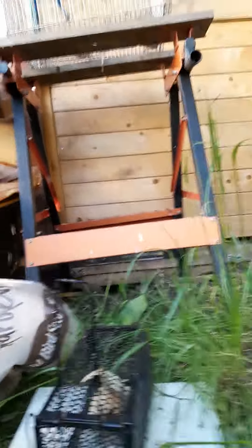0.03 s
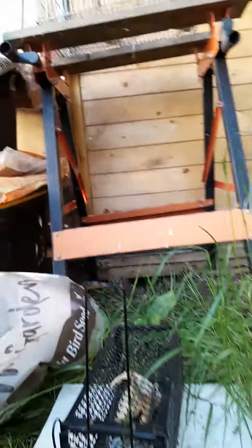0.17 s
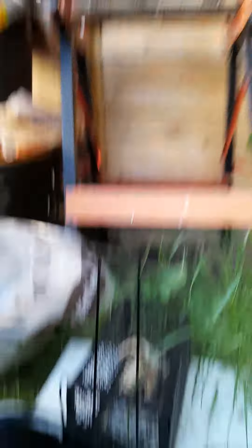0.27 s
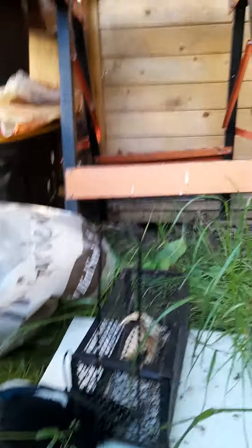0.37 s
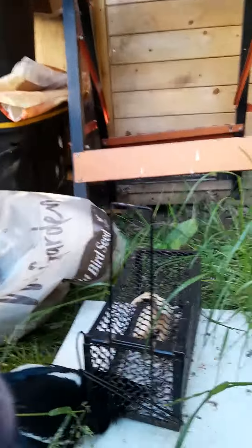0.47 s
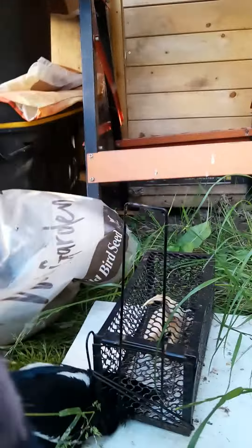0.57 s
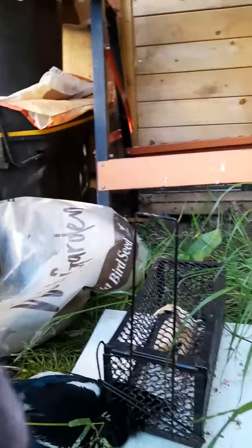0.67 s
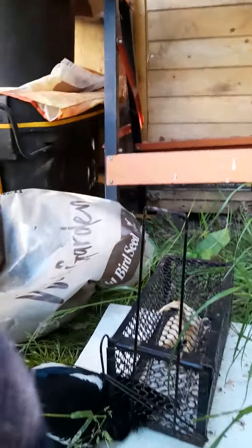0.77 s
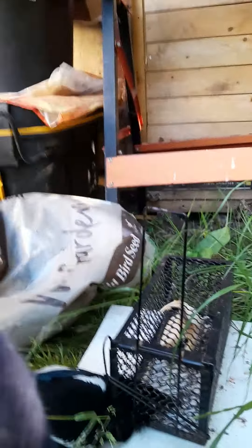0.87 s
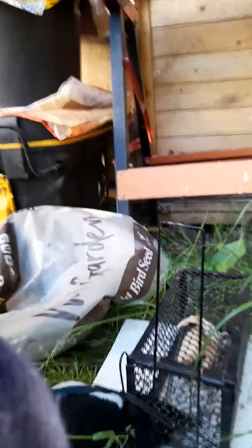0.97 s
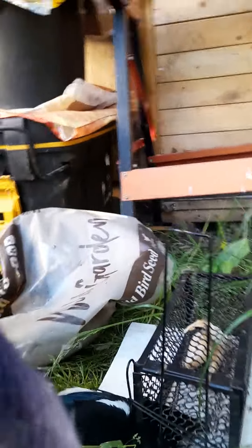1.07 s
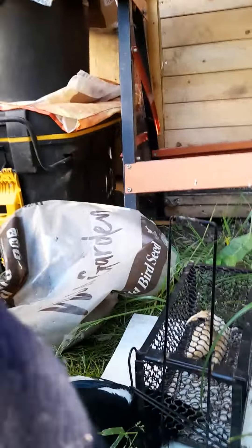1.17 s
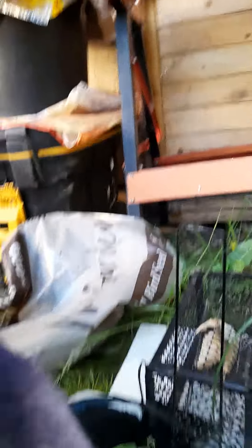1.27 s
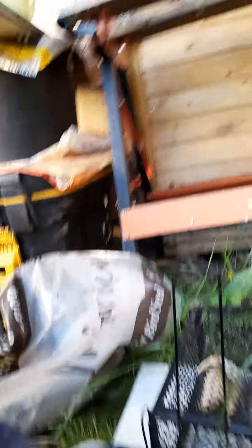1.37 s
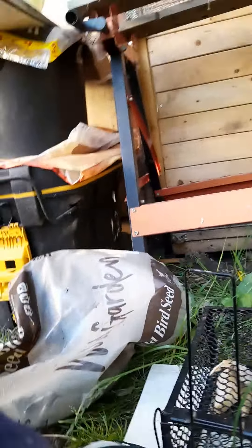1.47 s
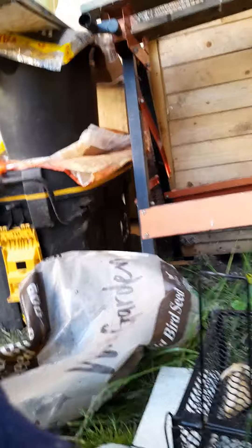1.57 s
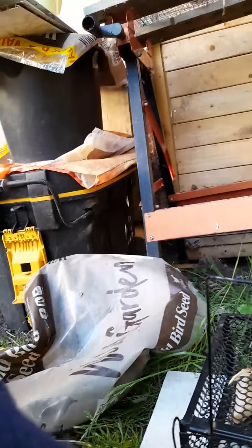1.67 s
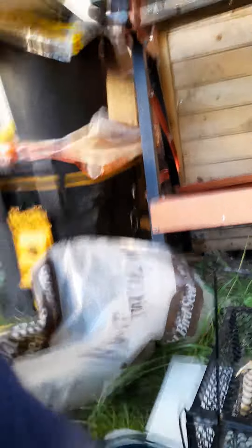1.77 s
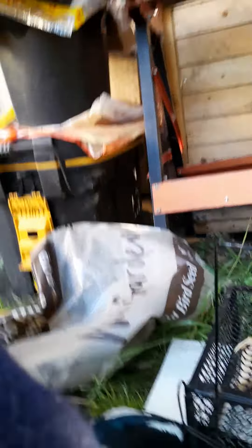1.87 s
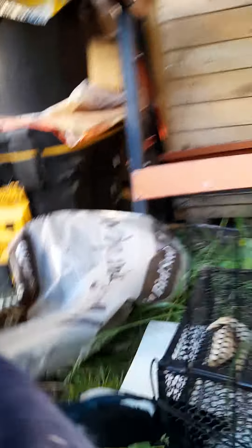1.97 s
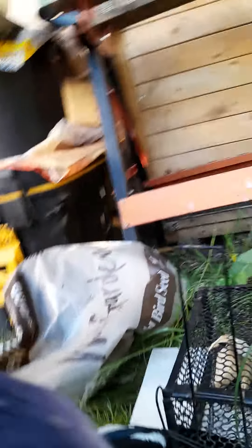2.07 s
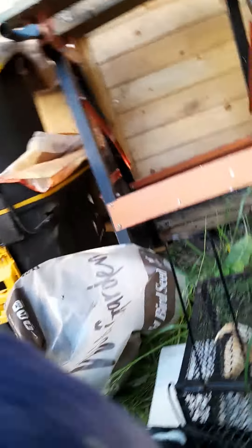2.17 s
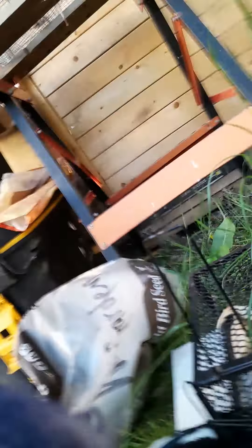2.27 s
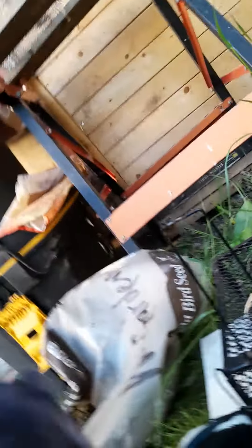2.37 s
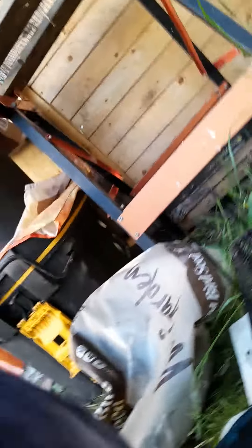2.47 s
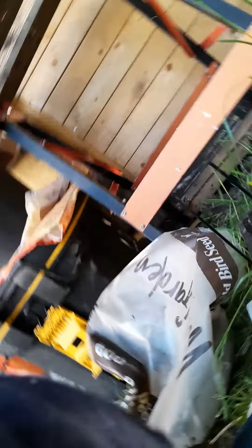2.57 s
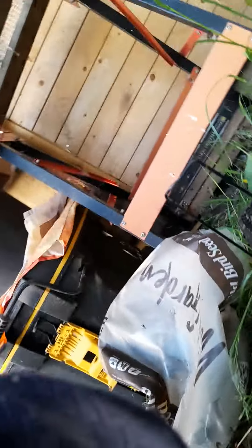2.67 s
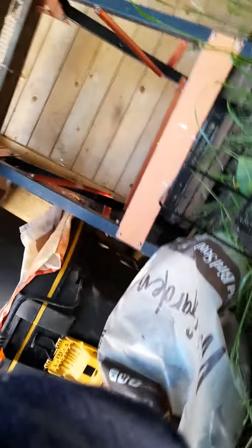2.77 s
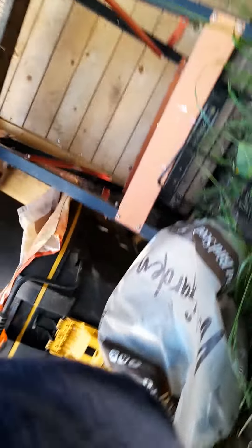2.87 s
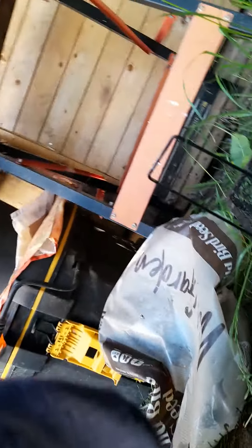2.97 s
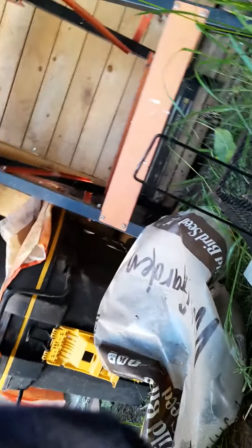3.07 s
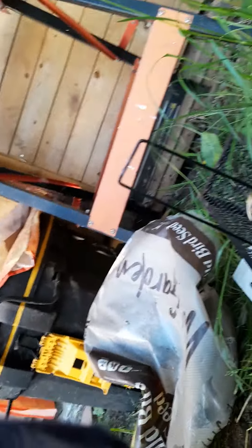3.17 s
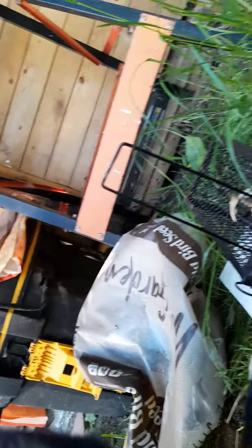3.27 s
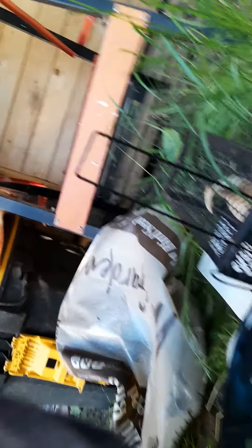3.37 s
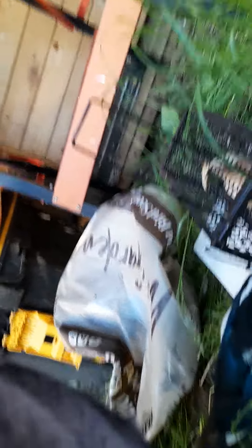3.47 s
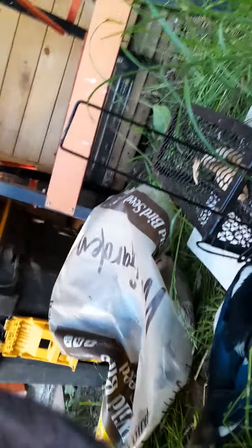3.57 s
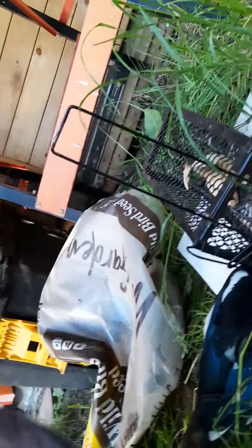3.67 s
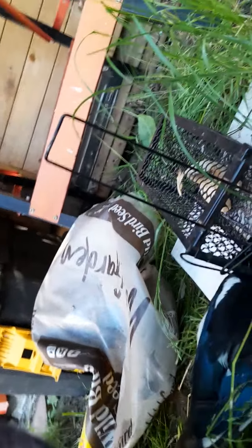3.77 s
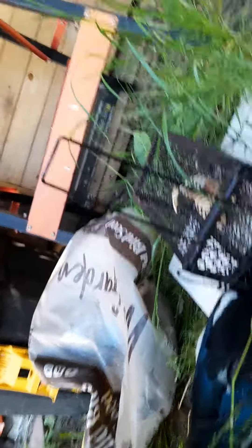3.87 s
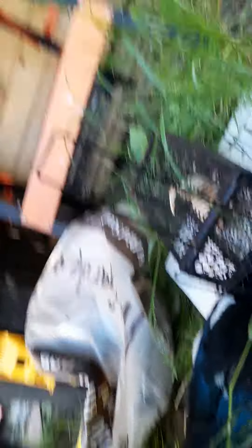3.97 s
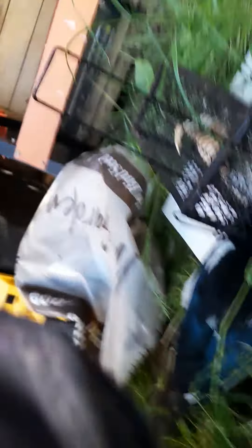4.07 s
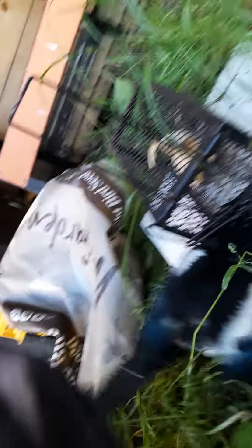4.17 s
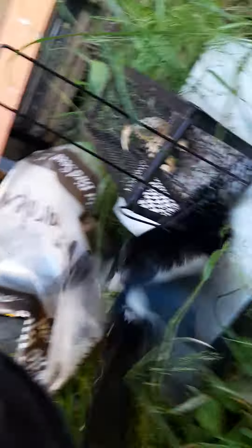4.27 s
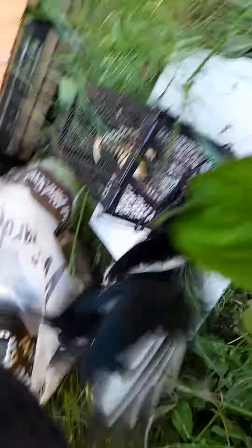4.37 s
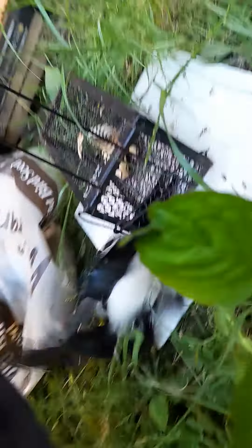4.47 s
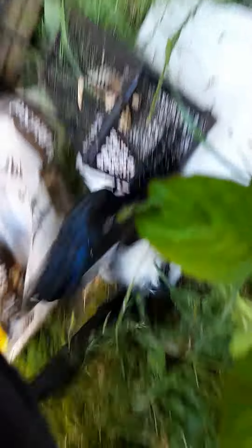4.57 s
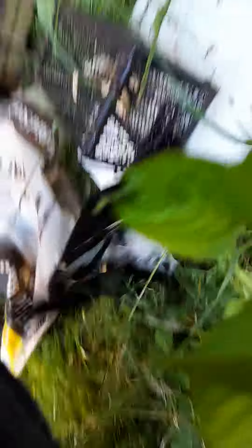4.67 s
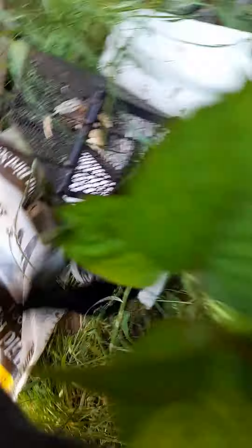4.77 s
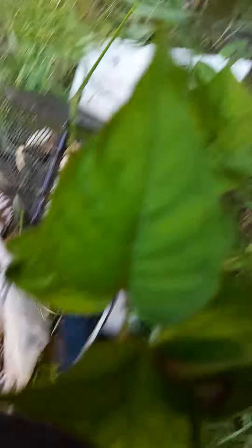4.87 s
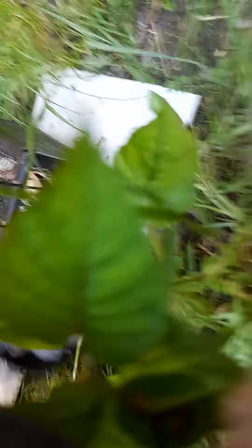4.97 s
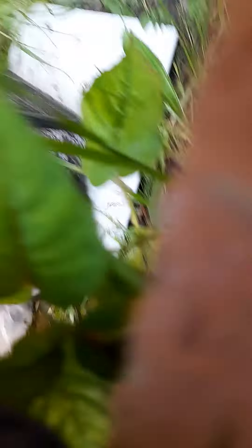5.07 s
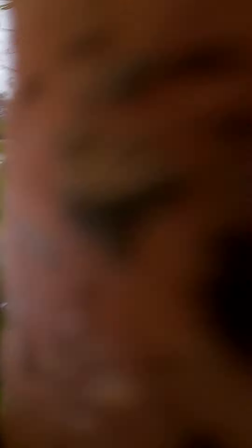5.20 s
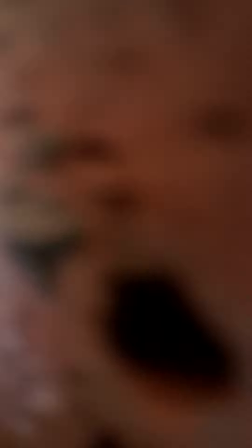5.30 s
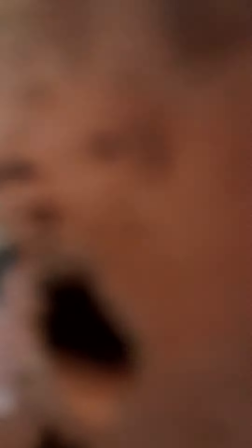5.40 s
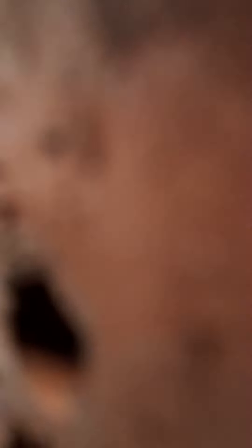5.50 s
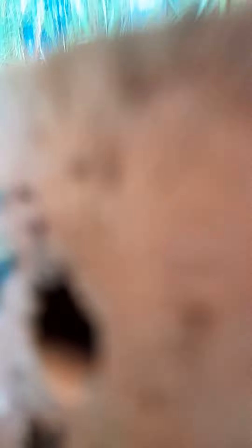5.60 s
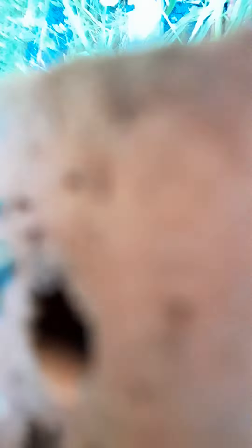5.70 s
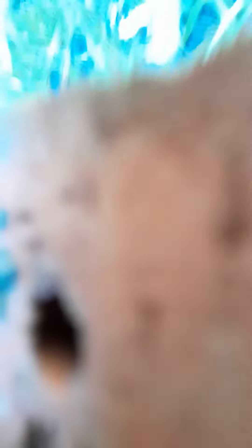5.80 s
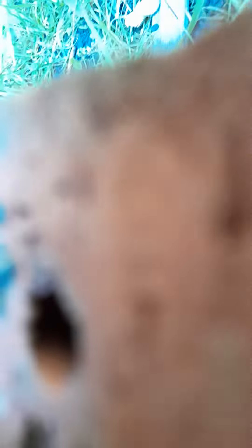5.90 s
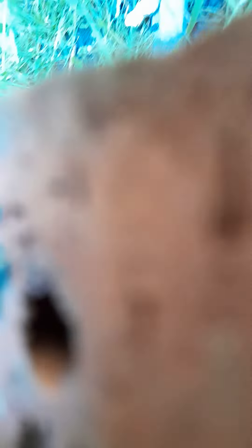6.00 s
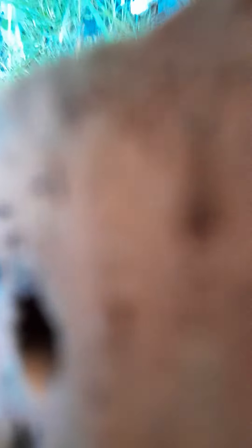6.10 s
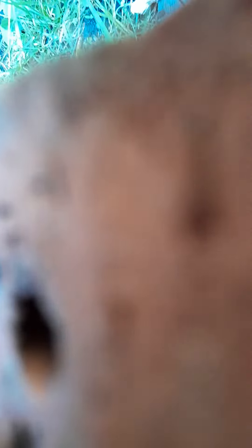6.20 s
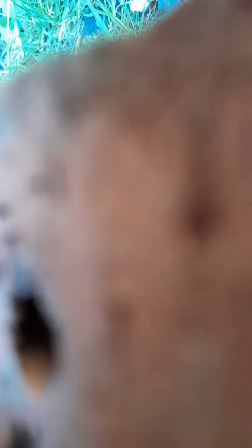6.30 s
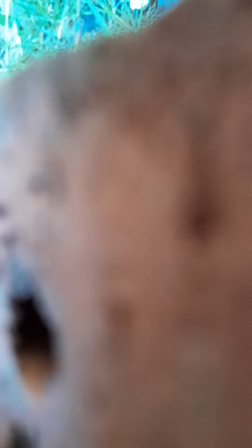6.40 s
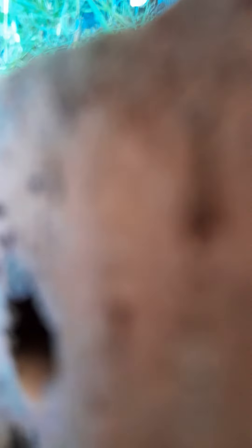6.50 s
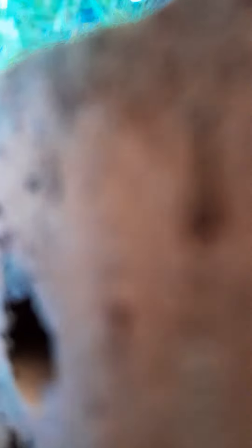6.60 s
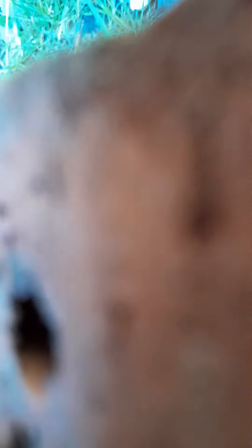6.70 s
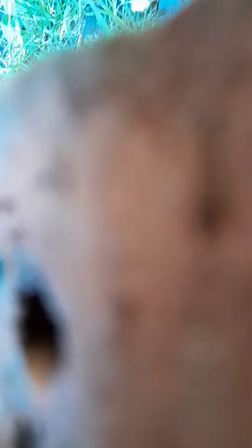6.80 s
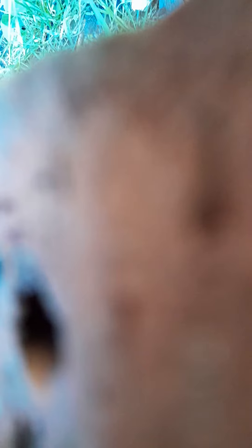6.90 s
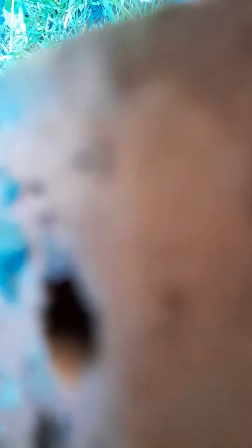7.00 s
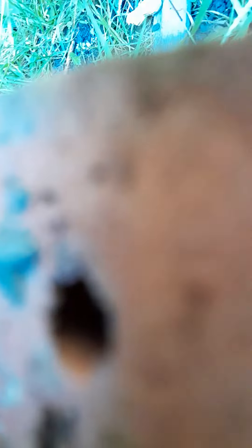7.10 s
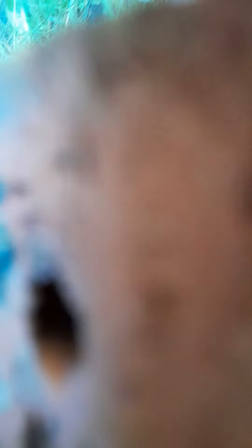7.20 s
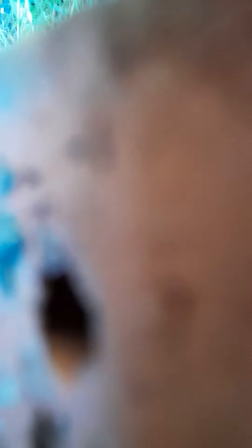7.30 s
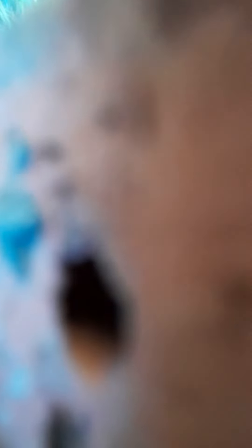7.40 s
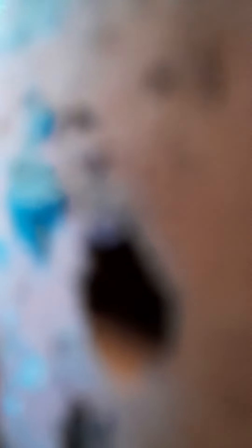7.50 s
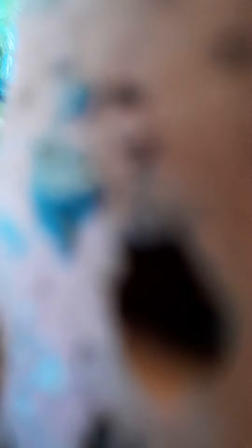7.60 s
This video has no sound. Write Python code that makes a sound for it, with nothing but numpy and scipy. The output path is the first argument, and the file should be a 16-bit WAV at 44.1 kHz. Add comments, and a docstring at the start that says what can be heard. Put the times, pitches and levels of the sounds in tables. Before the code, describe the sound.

In a garden, a bird lightly taps a wire cage, then thrashes in the grass with loud mesh bangs, cracks, rustling and low thuds.

```python
"""A bird at a wire cage

In a garden, with a phone in the hand, a bird taps a cage, then thrashes in the grass and bangs the mesh.
Blows ring decaying modes, snaps are noise bursts, thuds sagging low notes; shaken mesh is resonant noise.
Feathers, leaves and cloth rustle as grainy coloured noise; sparrows and other birds are gliding sines with echoes.
Traffic and town are coloured noise; one engine slows down, a sinking tone with a second harmonic.
"""
import sys
import numpy as np
from scipy import signal
from scipy.fft import rfft, irfft, next_fast_len
from scipy.io import wavfile
from scipy.ndimage import uniform_filter1d

SR = 44100
rng = np.random.default_rng(int(sys.argv[2]) if len(sys.argv) > 2 else 0)


def wrap_up_sound(samples):
    """Save the sound to the file named by the first command line argument, as 16-bit audio."""
    columns = np.atleast_2d(samples).T
    # keep every value between -1 and 1, then stretch to whole-number steps
    tamed = np.clip(columns, -1, 1)
    steps = np.round(tamed * 32767).astype(np.int16)
    wavfile.write(sys.argv[1], SR, steps)


N = 337351
T = np.arange(N) / SR  # time, s

# Levels are relative and precede the phone's response; spectra give weights that are then set to rms 1.
# Noise of the garden: pitch_hz, density_db
GARDEN_SPECTRUM = [(59, -44.5), (100, 2.5), (210, -14), (239, -7.5), (315, -18.5), (1150, -25.5),
                   (1520, -32), (5000, -38.5), (8500, -33), (9300, -44), (16000, -36.5)]
# Rumble of distant engines: pitch_hz, density_db
RUMBLE_SPECTRUM = [(28, -16.5), (55, 14), (80, 9), (130, -40)]
# Course of the traffic rumble: time_s, level_db
TRAFFIC_LEVEL = [(0.0, -35), (0.22, -51.5), (0.55, -63), (1.5, -67), (2.23, -51), (3.3, -65.5),
                 (3.78, -49.5), (4.21, -49), (4.44, -43), (4.97, -50), (5.25, -37), (6.85, -40.5),
                 (6.93, -55.5), (7.08, -46.5), (7.25, -60), (7.65, -51.5)]
# Course of the single engine note: time_s, level_db
ENGINE_LEVEL = [(5.4, -37), (6.0, -38.5), (6.16, -29.5), (6.4, -32), (6.46, -48), (6.55, -32), (6.9, -46.5),
                (6.94, -88.5)]
# Sparrow chirps: start_s, level_db, top_pitch_hz
CHIRPS = [(0.749, -54, 5026), (1.884, -50.5, 4950), (2.99, -52.5, 5024), (3.912, -51, 5140),
          (6.133, -57.5, 5500)]
# Arched tweets of other birds: start_s, length_s, top_pitch_hz, drop_at_both_ends (share of the top), level_db
TWEETS = [(2.888, 0.06, 5500, 0.57, -61), (3.319, 0.11, 4970, 0.14, -65), (3.878, 0.04, 6050, 0.15, -63.5),
          (7.062, 0.065, 5810, 0.38, -59.5), (7.147, 0.055, 4540, 0.3, -65),
          (7.421, 0.045, 5420, 0.12, -68.5), (7.506, 0.062, 5800, 0.099, -70)]
# Whistles gliding evenly, most of them falling: start_s, length_s, first_pitch_hz, last_pitch_hz, level_db
WHISTLES = [(0.096, 0.057, 3006, 2360, -58.5), (0.41, 0.1, 3840, 3790, -69),
            (1.231, 0.11, 3800, 3480, -68.5), (2.837, 0.14, 3690, 3980, -65.5),
            (3.163, 0.054, 3210, 2500, -60.5), (3.375, 0.067, 3705, 2850, -59),
            (6.218, 0.22, 4010, 3500, -69)]
# Throat resonances of the hoarse call: centre_hz, width_hz, weight_db
THROAT = [(1550, 200, -4), (3780, 1200, -0.5)]
# Swishes of feathers, leaves and cloth: middle_s, half_length_s, hiss_level_db
SWISHES = [(0.036, 0.0097, -27.5), (0.977, 0.026, -53), (1.207, 0.02, -56), (1.868, 0.021, -53.5),
           (2.154, 0.046, -60), (2.275, 0.022, -59), (2.488, 0.024, -61.5), (4.165, 0.015, -47.5),
           (4.42, 0.015, -38), (4.674, 0.0093, -22.5), (5.193, 0.035, -45.5), (5.244, 0.0051, -26),
           (5.47, 0.018, -40), (5.574, 0.011, -36), (5.591, 0.011, -26.5), (5.686, 0.019, -27),
           (5.792, 0.032, -51), (5.891, 0.037, -50), (5.949, 0.0051, -32.5), (6.034, 0.11, -61),
           (6.616, 0.036, -46), (6.765, 0.031, -55), (6.86, 0.024, -44), (7.552, 0.064, -56.5)]
# Bouts of thrashing in the grass: start_s, end_s, level_db
THRASH = [(4.218, 5.325, -47), (5.405, 5.851, -44)]
# Bright part of the rustle: pitch_hz, density_db
HISS_SPECTRUM = [(1500, -28), (2600, -12), (7000, -6.5), (9000, -11.5), (13000, -14.5), (16000, -8)]
# Duller part of the rustle: pitch_hz, density_db
BODY_SPECTRUM = [(150, 3.5), (500, -7.5), (1000, -10.5), (2000, -10.5), (7000, -19)]
# Borders of the bands that swell apart: pitch_hz
PATCH_EDGES_HZ = [700, 1500, 3000, 5500, 9000]
# Balance as the phone swings about: time_s, left_minus_right_db
PAN = [(0, -37), (1.8, -5.5), (3.7, -20), (4.2, 8), (6, 6.5), (7.6, 11)]
# Dull thuds through the ground and the hand: start_s, peak_db, initial_pitch_hz
THUDS = [(0.855, -37, 136), (0.981, -31, 94), (4.318, -22, 217), (4.39, -27.5, 95), (5.108, -26, 220),
         (5.256, -25, 127), (5.43, -21, 111), (5.466, -17, 89), (5.59, -20, 88), (5.681, -16.5, 229),
         (5.818, -15.5, 200), (6.144, -28, 190), (7.297, -28.5, 154), (7.445, -36.5, 150),
         (7.517, -32, 139)]
# Modes of the cage, before scatter, detuning and damping: pitch_hz, weight_db, t60_s
CAGE = [(509.4, 7, 0.16), (644, 10.5, 0.067), (780, 2.5, 0.075), (1004.7, 12, 0.088), (1222, 12, 0.052),
        (1645, 8, 0.08), (2007, 11, 0.076), (3313, 15.5, 0.06)]
# Blows on the cage: start_s, ring_peak_db, pitch_of_struck_spot_hz
BLOWS = [(1.827, -24, 885), (3.412, -50.5, 774), (3.777, -36.5, 680), (4.217, -29.5, 524),
         (4.26, -18.5, 1460), (4.321, -4.5, 1060), (4.409, -25.5, 890), (4.499, -22, 530),
         (4.639, -21, 1000), (4.777, -11.5, 1020), (4.874, -28, 1520), (4.988, -22, 1000),
         (5.024, -21.5, 1040), (5.109, -10.5, 750), (5.147, -9, 1100), (5.179, -20, 556), (5.42, -9, 587),
         (5.434, -17, 840), (5.502, -15.5, 890), (5.584, -9.5, 574), (5.76, -21.5, 496), (5.82, -18.5, 440),
         (5.945, -30.5, 662), (7.004, -36, 1710), (7.284, -38.5, 480)]
# Snaps of quills, twigs and wire: start_s, level_db, sharpness_db (weight of the top treble)
SNAPS = [(0.0295, -30.5, 8.5), (0.058, -38.5, 6.5), (0.959, -38, -7), (0.9897, -31, -2.5),
         (1.8268, -22.5, -12), (2.762, -40.5, -2.5), (4.2278, -17, -2.5), (4.3192, 2, -8),
         (4.351, -24.5, 12.5), (4.486, -16, -13), (4.6363, -22.5, 6.5), (4.6425, -6, -19),
         (4.7182, -18, 1.5), (4.776, -7.5, -4.5), (4.8778, -9.5, -17), (4.9442, -13, -7.5),
         (4.9866, -18, -15), (5.1466, -2, -3.5), (5.2984, -27, 10), (5.3842, -29.5, 11.5),
         (5.4208, -15.5, -4.5), (5.4338, -12.5, -10), (5.4615, -26, 12.5), (5.5896, -19.5, 8),
         (5.8264, -27, -2), (7.004, -39, -3), (7.2917, -43.5, 6), (7.5026, -31, -11), (7.5097, -36, -5),
         (7.522, -37, -8), (7.635, -39.5, -12)]

GARDEN_DB = -59
ENGINE_S, ENGINE_HZ, SAG_HZ_PER_S = 5.4, 79.8, 22  # pitch at this time, and its even fall
# A chirp is two syllables, each a rise and a quick fall; the first rebounds, the second is lower and sinks.
RISE_FROM, FALL_TO, REBOUND_TO, SINK_TO = 0.78, 0.72, 0.8, 0.62  # shares of the syllable's top pitch
RISE_S, FALL_S, TAIL_S = 0.024, 0.013, 0.012
SECOND_S, SECOND_PITCH, SECOND_DB = 0.054, 0.83, -2  # delay, pitch ratio and level of the second syllable
RASP_S, RASP_LENGTH_S, RASP_HZ, RASP_DB = 3.12, 0.058, 347, -67
NEAR_T60_S, NEAR_DB = 0.13, 5  # echoes off the near sheds
WALLS_T60_S, WALLS_DB = 0.35, -1  # echoes off the far walls
SWISH_BODY_DB, THRASH_BODY_DB = -5, 6.5  # body against hiss
FULLER_DB = 7.5  # body gained when a swish lasts twice as long
STIR_DB_PER_S, SETTLE_DB_PER_S = 600, 250  # slopes before and after a bout
MESH_DB = -3  # hum of the shaken mesh against the thrashing level
TOP_HZ = 15900  # upper limit of the phone


def undb(db):
    """Level law: a gain is ten to the power of decibels over twenty."""
    return 10 ** (np.asarray(db) / 20)


def unit(x):
    """Normalisation: scale to rms 1."""
    return x / np.sqrt(np.mean(x ** 2))


def columns(rows):
    """Linear interpolation: join table rows by straight lines in time."""
    time_s, *values = np.transpose(rows)
    return [np.interp(T, time_s, value) for value in values]


def fade(t, t60):
    """Exponential decay: the level falls by 60 dB in t60 seconds."""
    return np.exp(-np.log(1000) * t / t60)


def colour(x, points):
    """Spectral shaping: weight the spectrum along log frequency, then scale to rms 1."""
    hz, db = np.transpose(points)
    size = next_fast_len(N)
    f = np.arange(size // 2 + 1) * SR / size + 1  # 1 Hz up, to avoid log 0
    weight = undb(np.interp(np.log(f), np.log(hz), db, left=-80))
    return unit(irfft(rfft(x, size) * weight, size)[..., :N])


def walk(rate):
    """Slow random modulation: levels renewed at this rate in Hz, joined by slopes; spread near 1."""
    hold = int(SR / rate)
    steps = np.repeat(rng.standard_normal(N // hold + 1), hold)
    return unit(uniform_filter1d(steps, hold)[:N])


def pair(alike):
    """Partial coherence: left and right noise that share a part of their power."""
    both, left, right = rng.standard_normal((3, N))
    alike = np.clip(alike, 0, 1)
    return np.sqrt(alike) * both + np.sqrt(1 - alike) * np.array([left, right])


def add(out, x, s, pan_db, lag_s):
    """Stereo localisation: a level difference and a small lag between the two ports."""
    for ch, (start, db) in enumerate([(s, pan_db / 2), (s + lag_s, -pan_db / 2)]):
        i = max(int(start * SR), 0)
        n = min(len(x), N - i)
        out[ch, i:i + n] += undb(db) * x[:n]


def patchy(x, rate, spread_db):
    """Independent band modulation: bands swell and sink apart, so the colour keeps changing."""
    out = 0
    for hz in PATCH_EDGES_HZ:
        low = signal.sosfiltfilt(signal.butter(2, hz, fs=SR, output="sos"), x)
        out = out + low * undb(spread_db * walk(rate))
        x = x - low
    return out + x * undb(spread_db * walk(rate))


def whistle(pitch):
    """Frequency modulation: a sine whose phase is the running sum of its pitch."""
    return np.sin(2 * np.pi * np.cumsum(pitch) / SR)


def garden():
    """Diffuse field: town noise and leaves, coherent in the bass, not the treble; lows and highs swell apart."""
    low = signal.butter(1, 400, fs=SR, output="sos")
    same, apart = pair(0.9), pair(0.029)
    air = colour(apart + signal.sosfilt(low, same - apart), GARDEN_SPECTRUM)
    town = signal.sosfiltfilt(signal.butter(2, 1500, fs=SR, output="sos"), air)
    leaves = patchy(air - town, 10, 2.5) * undb(2 * walk(5))
    return undb(GARDEN_DB) * (town * undb(0.5 * walk(0.85)) + leaves)


def traffic():
    """Noise and tone: distant engines merge into a rumble; one engine's sinking note carries the bass."""
    hz = ENGINE_HZ - SAG_HZ_PER_S * (T - ENGINE_S)
    sounding = (T > ENGINE_LEVEL[0][0]) * (T < ENGINE_LEVEL[-1][0])
    on = uniform_filter1d(1. * sounding, 1500)
    # the rumble yields 6 dB while the engine note lasts
    rumble = colour(pair(.75), RUMBLE_SPECTRUM) * undb(columns(TRAFFIC_LEVEL)[0] - 6 * on)
    octave = undb(-23.0) * whistle(2 * hz * (1 + 0.032 * walk(48)))
    level = undb(columns(ENGINE_LEVEL)[0] + 1.3 * walk(17))
    note = on * np.sqrt(2) * level * (whistle(hz) + octave)
    return rumble + np.array([note, np.roll(note, 60) * undb(-1.0)])


def rasp():
    """Source and filter: the overtones of a hoarse call, weighted by throat resonances."""
    t = T[:int(RASP_LENGTH_S * SR)]
    hz = RASP_HZ * np.arange(1, 22)[:, None]
    drift = 2 * np.pi * np.cumsum(1 + 0.01 * walk(80)[:len(t)]) / SR
    gain = sum(undb(db) * np.exp(-((hz - mid_hz) / width) ** 2) for mid_hz, width, db in THROAT)
    gain = gain * undb(5 * rng.standard_normal(hz.shape))  # uneven overtones
    swell = np.sqrt(np.sin(np.pi * t / RASP_LENGTH_S))
    return undb(RASP_DB) * swell * (gain * np.sin(hz * drift)).sum(0)


def chirps(dry):
    """Pitch glide: each sparrow syllable is a near-sine that rises, falls and trails off."""
    knots = np.cumsum([0, RISE_S, FALL_S, TAIL_S])
    t = T[:int(knots[-1] * SR)]
    tail_fade = undb(-400 * np.maximum(t - knots[2], 0))  # the tail dies away
    swell = np.sin(np.pi * t / knots[-1]) ** 0.3 * tail_fade
    syllables = [(0, 1, 0, REBOUND_TO), (SECOND_S, SECOND_PITCH, SECOND_DB, SINK_TO)]
    for s, level_db, top_hz in CHIRPS:
        for late_s, share, db, tail in syllables:
            shape = np.interp(t, knots, [RISE_FROM, 1, FALL_TO, tail])
            glide = share * top_hz * uniform_filter1d(shape, 150)
            i = int((s + late_s) * SR)
            voice = whistle(glide * (1 + 0.012 * walk(700)[:len(t)]))
            dry[i:i + len(t)] += undb(level_db + db) * swell * voice


def other_birds(dry, burr=0.04):
    """Pitch glide: tweets follow a parabola, whistles a straight line, both with a random burr."""
    waver = walk(900)
    notes = [(s, length, db, lambda u, hz=hz, arch=arch: hz * (1 - arch * (2 * u - 1) ** 2))
             for s, length, hz, arch, db in TWEETS]
    notes += [(s, length, db, lambda u, a=a, b=b: a + (b - a) * u) for s, length, a, b, db in WHISTLES]
    for s, length, level_db, shape in notes:
        i, n = int(s * SR), int(length * SR)
        u = np.linspace(0, 1, n)
        voice = whistle(shape(u) * (1 + burr * waver[i:i + n]))
        dry[i:i + n] += undb(level_db) * np.sqrt(np.sin(np.pi * u)) * voice


def birds():
    """Reverberation: calls convolved with decaying noise, as echoes off sheds and walls smear them."""
    dry = np.zeros(N)
    chirps(dry)
    call = rasp()
    dry[int(RASP_S * SR):][:len(call)] += call
    other_birds(dry)
    t = T[:SR // 2]
    echo = sum(undb(db) * unit(fade(t, t60)) * rng.standard_normal((2, len(t)))
               for t60, db in [(NEAR_T60_S, NEAR_DB), (WALLS_T60_S, WALLS_DB)]) / np.sqrt(len(t))
    wet = signal.fftconvolve(dry[None], echo, axes=1)[:, :N]
    return np.array([dry, np.roll(dry, 9)]) + wet


def astir(t):
    """Envelope of the thrashing: quick to start, held, slow to settle."""
    return sum(undb(db - STIR_DB_PER_S * np.maximum(start - t, 0) - SETTLE_DB_PER_S * np.maximum(t - end, 0))
               for start, end, db in THRASH)


def rustle(flutter_db=1.0, grain_db=1.0):
    """Granular friction: feathers, leaves and cloth give swells of dense, uneven grains, a hiss and a body."""
    hiss = astir(T) * undb(4 * walk(55))
    body = np.sqrt(hiss * astir(T)) * undb(THRASH_BODY_DB + 2.27 * walk(45))
    for s, half, db in SWISHES:
        near = slice(max(int((s - 6 * half) * SR), 0), int((s + 6 * half) * SR))
        swell = undb(db - 12.1 * (np.hypot(1, (T[near] - s) / half) - 1))  # round top, even fade
        hiss[near] += swell
        body[near] += swell * undb(SWISH_BODY_DB + FULLER_DB * np.log2(min(half, 0.04) / 0.018))
    grain_levels = np.minimum(rng.exponential(size=N // 40 + 1), 6)
    grains = undb(grain_db * np.repeat(grain_levels, 40)[:N])
    # dry stalks crackle, about 90 ticks a second
    ticks = (rng.random(N) < 90 / SR) * undb(4 * np.minimum(rng.exponential(size=N), 2.5) - 3)
    grains = grains * (1 + np.convolve(ticks, fade(T[:SR // 50], 0.012))[:N])
    hiss = hiss * unit(colour(pair(0.13) * grains, HISS_SPECTRUM) * undb(flutter_db * walk(150)))
    body = body * unit(colour(pair(0.12) * grains, BODY_SPECTRUM) * undb(flutter_db * walk(70)))
    pan_db = 0.09 * columns(PAN)[0]  # spread-out sources move less
    return undb(np.array([pan_db, -pan_db]) / 2) * patchy(hiss + body, 45, 4.4)


def thuds(decay_cycles=7.952):
    """Damped oscillation: soft, slow pushes give a few cycles of a low note that sags."""
    out, t = np.zeros((2, N)), T[:SR // 5]
    for s, db, hz in THUDS:
        onset = 1 - np.exp(-hz * t / 0.051)
        x = np.sin(2 * np.pi * hz * t * (1 - 1.1 * t)) * fade(t, decay_cycles / hz) * onset
        add(out, undb(db) * x / np.abs(x).max(), s, 1.5, .0004)
    return out


def mesh():
    """Forced resonance: uneven jolts keep the lowest cage modes humming while the bird thrashes."""
    jolts = pair(0.37) * undb(11.0 * walk(60))
    hum = sum(undb(db) / hz * signal.lfilter(*signal.iirpeak(hz, hz * t60 / 3.9, fs=SR), jolts)
              for hz, db, t60 in CAGE[:4])
    return undb(MESH_DB) * astir(T) * unit(hum)


def crack(t, level_db, sharp_db, pan_db, t60=0.031, sharp_t60=0.016):
    """Impulsive fracture: a burst of treble noise whose top dies first."""
    hiss = rng.standard_normal((3, len(t)))
    burst = hiss[0] + 1.1 * hiss[1:]  # partly shared by the ports
    band = signal.butter(1, [2000, 5000], "band", fs=SR, output="sos")
    bright = signal.sosfilt(band, burst) * fade(t, t60) * np.minimum(t / 0.0024, 1)
    # differentiation tilts the noise towards the top
    sharp = undb(sharp_db) * np.gradient(burst, axis=1) * fade(t, sharp_t60) * np.minimum(t / 0.00073, 1)
    return undb(level_db + np.array([[pan_db], [-pan_db]]) / 2) * (bright + sharp) / 2


def cage_ring(t, ring_db, spot_hz, chance, knock=3, knock_t60=0.012):
    """Modal synthesis: a blow excites the modes near the pitch of the struck spot, each decaying."""
    hz, db, t60 = np.transpose(CAGE)[:, :, None]
    scatter_db, detune, reach = 3.5, 0.025, 0.65  # reach in log frequency
    held = min(undb(0.4 * (ring_db + 7)), 1)  # light taps die sooner
    share = undb(db + scatter_db * chance[0]) * np.exp(-(np.log(hz / spot_hz) / reach) ** 2)
    wave = np.sin(2 * np.pi * hz * (1 + detune * chance[1]) * t + chance[2])
    ring = (share * wave * fade(t, t60 * held)).sum(0)
    # damped hard while the body still touches
    return ring * (1 + knock * fade(t, knock_t60)) * np.minimum(t / 0.0018, 1)


def blows(lag_s=0.00029, rattle_db=13, buzz_db=4, count=70):
    """Impact excitation: blows ring the cage, snaps crack, and small rattles fill the struggle."""
    out, t = np.zeros((2, N + SR)), T[:SR // 6]
    buzz = np.pad(walk(500), (0, SR))
    u = rng.random((count, 4))
    when = THRASH[0][0] + (THRASH[-1][1] - THRASH[0][0]) * u[:, 0]
    small_db = rattle_db + 20 * np.log10(astir(when)) + 10.0 * u[:, 1]
    rattles = np.c_[when, small_db, 450 * 5 ** u[:, 2]]
    rattle_snaps = np.c_[when, small_db - 16 * u[:, 3], -14 * u[:, 2]]
    side_db = lambda s: np.interp(s, *np.transpose(PAN))
    for s, ring_db, spot_hz in np.r_[BLOWS, rattles]:
        chance = rng.standard_normal((3, len(CAGE), 1))
        ring = cage_ring(t, ring_db, spot_hz, chance)
        ring = ring * undb(buzz_db * buzz[int(s * SR):][:len(t)])  # loose wire buzzes on the ring
        pan_db = side_db(s) + 0.55 * chance[2, 0, 0]
        add(out, undb(ring_db) * ring / np.abs(ring).max(), s, pan_db, lag_s * chance[2, 1, 0])
    for s, level_db, sharp_db in np.r_[SNAPS, rattle_snaps]:
        i = int(s * SR)
        out[:, i:i + len(t)] += crack(t, level_db, sharp_db, side_db(s))
    return out[:, :N]


def scene():
    """Superposition: the pressures of all sources add at the two ports."""
    return garden() + traffic() + birds() + rustle() + thuds() + mesh() + blows()


def record(dry):
    """Band limiting and saturation: the phone cuts the deepest bass, rounds loud peaks and cuts the top."""
    dry = signal.sosfilt(signal.butter(2, 30, "high", fs=SR, output="sos"), dry)
    rounded = 0.68 * np.tanh(dry / 0.84)
    return signal.sosfilt(signal.ellip(10, .2, 80, TOP_HZ, fs=SR, output="sos"), rounded)


dry = scene()
out = record(dry)
wrap_up_sound(out)
```